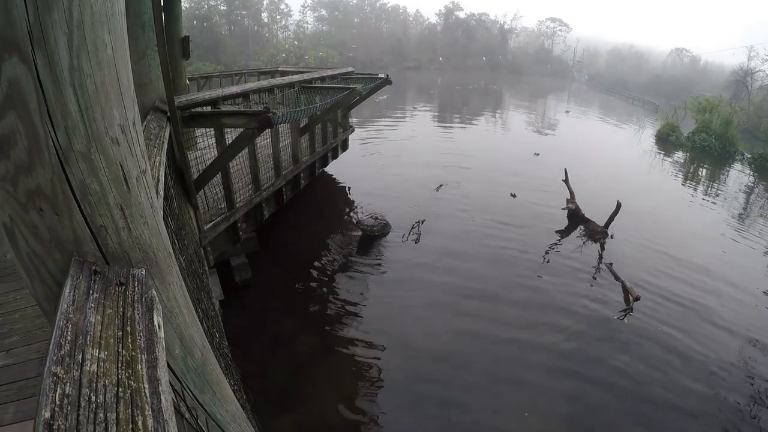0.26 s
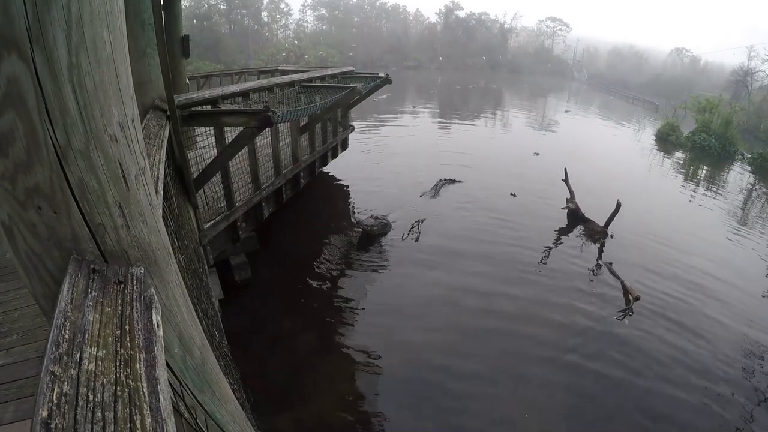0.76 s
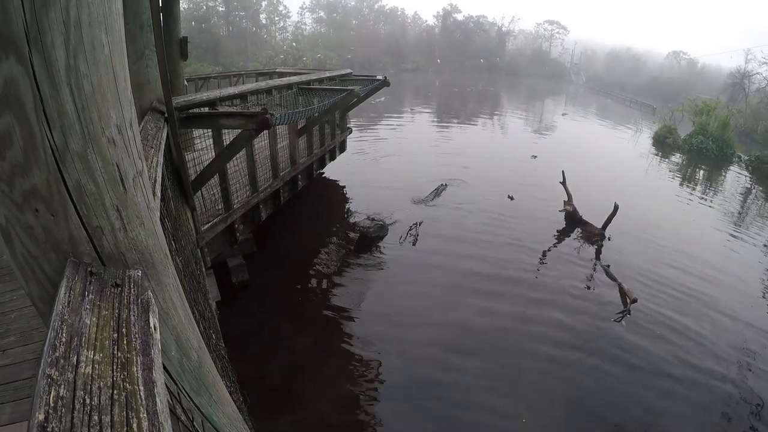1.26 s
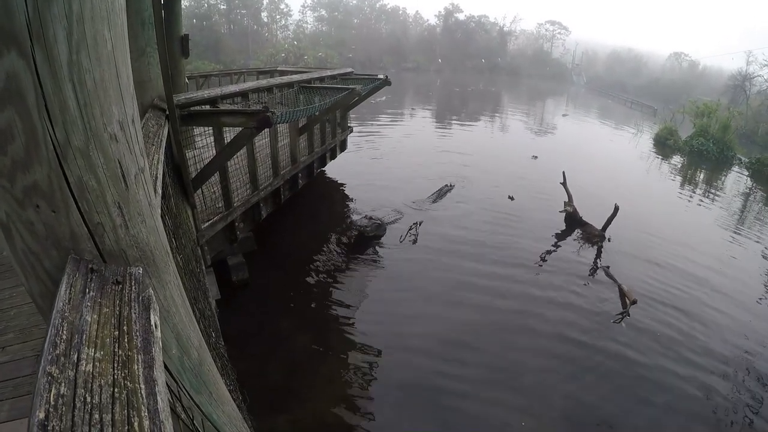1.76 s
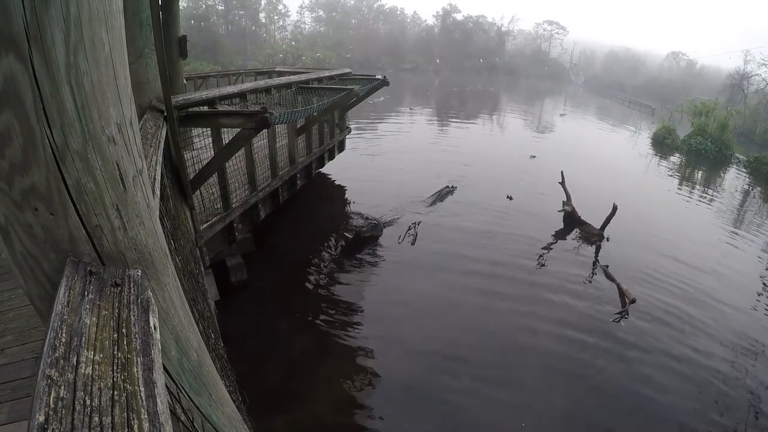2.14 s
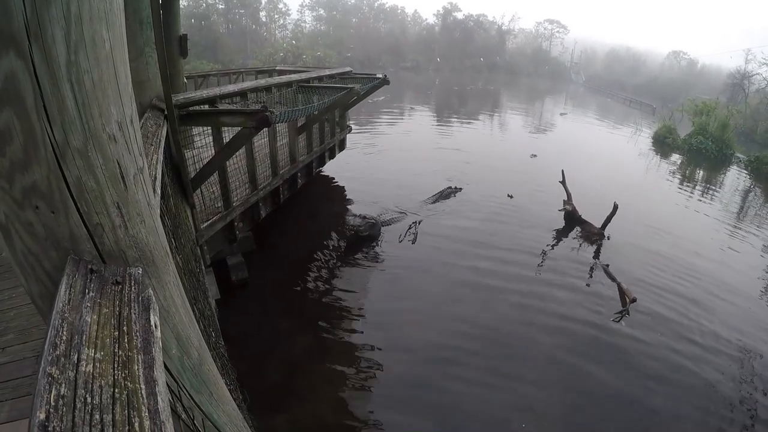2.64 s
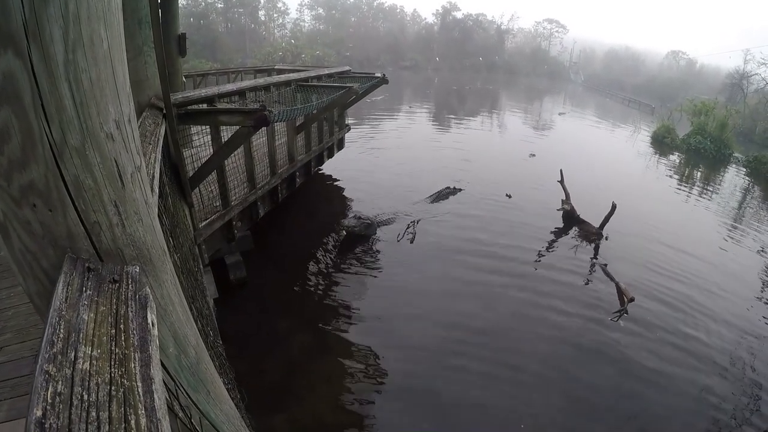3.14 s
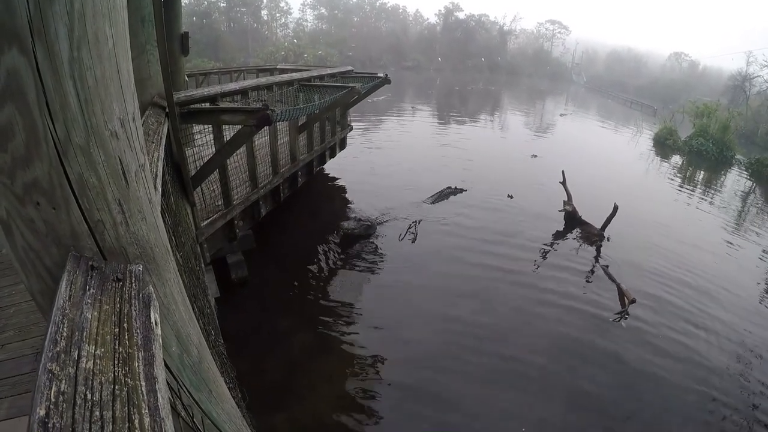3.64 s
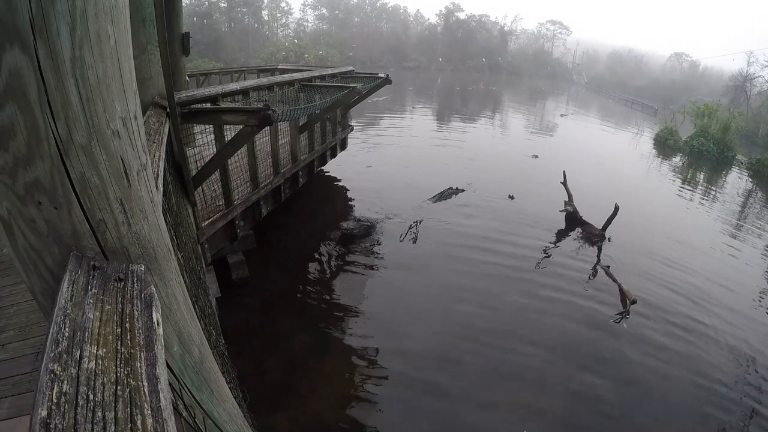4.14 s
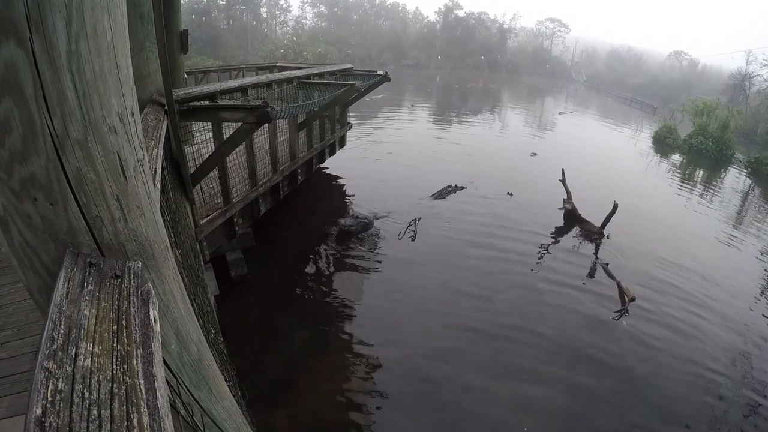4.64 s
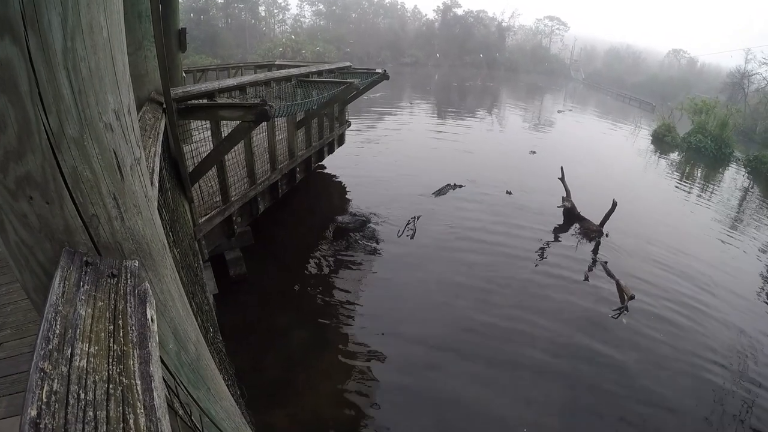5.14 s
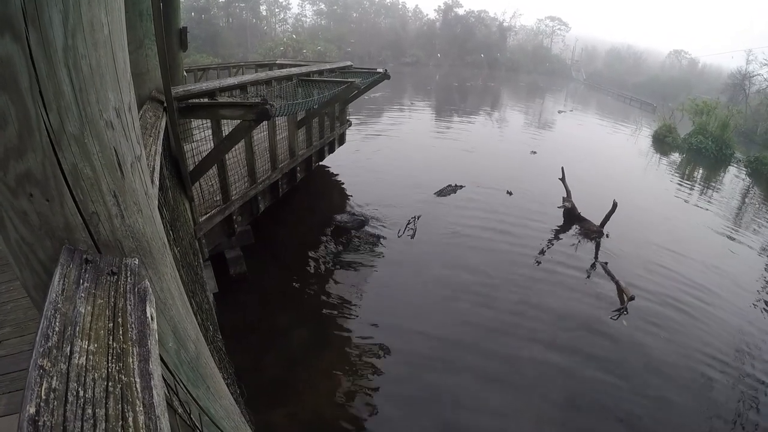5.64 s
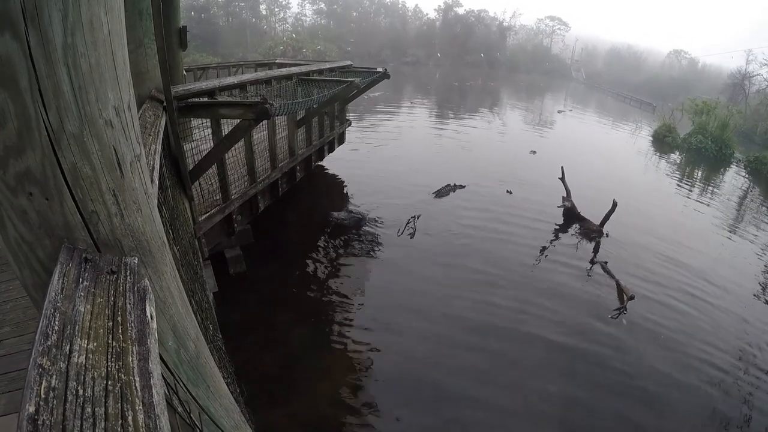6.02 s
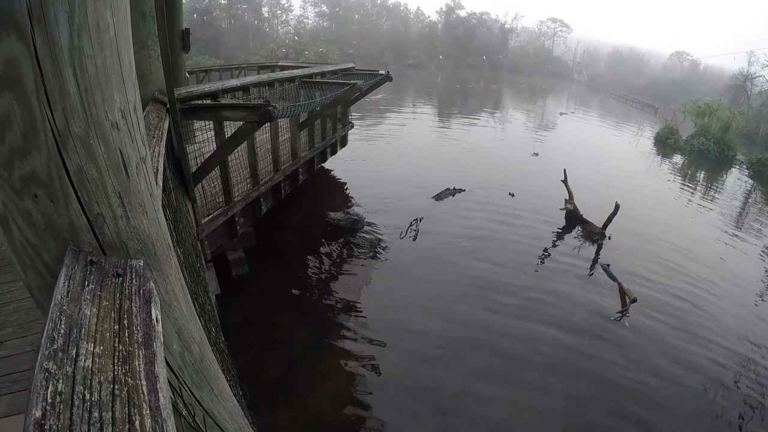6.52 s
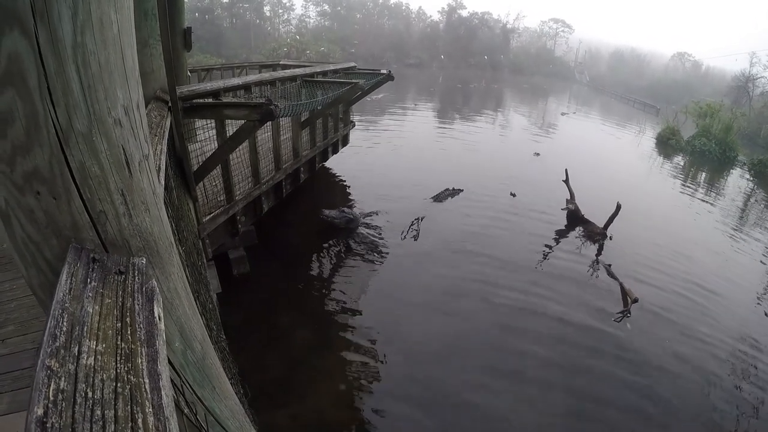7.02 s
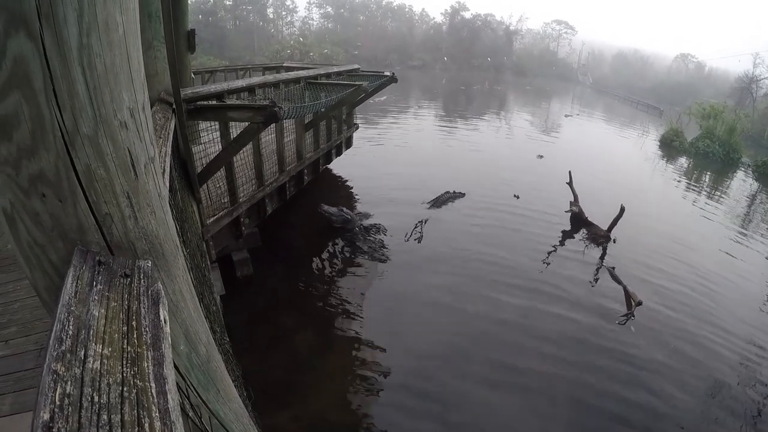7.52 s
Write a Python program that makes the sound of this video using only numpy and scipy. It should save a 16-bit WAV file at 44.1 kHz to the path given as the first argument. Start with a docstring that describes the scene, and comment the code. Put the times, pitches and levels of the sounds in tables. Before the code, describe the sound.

Deep rumbling alligator roars, near and far, with a low shudder, slapping beats and dancing droplets, under sharp falling bird chips.

```python
"""Alligators bellow in turn on a foggy pond, heard from a boardwalk, while a bird chips in a falling series.
The nearest one shudders almost below hearing, then roars in slaps and gusts while water dances on its back.
Each bellow is a train of vocal-fold pulses and rough air, shaped by the tones of a throat.
Chips and whistles are gliding tones, rasping calls are filtered noise, and drops are short rings.
Under it all lie a distant rumble, soft air and a faint high whine."""
import sys
import numpy as np
from scipy import signal
from scipy.fft import rfft, irfft, next_fast_len
from scipy.io import wavfile
from scipy.ndimage import uniform_filter1d, map_coordinates

SR = 44100
rng = np.random.default_rng(int(sys.argv[2]) if len(sys.argv) > 2 else 0)


def generate_wav(signal):
    """Clip the signal to [-1, 1] and save it as 16-bit WAV at the path in sys.argv[1]."""
    frames = np.transpose(np.atleast_2d(signal))
    scaled = np.clip(frames, -1, 1) * 32767
    pcm = np.round(scaled).astype(np.int16)
    wavfile.write(sys.argv[1], SR, pcm)


N = 342657
T = np.arange(N) / SR   # time of every sample, s

# colour of the droplets dancing on the later bellows: f/Hz, level/dB
LATE_SPRAY_COLOUR = [(750, -19), (1100, 3), (1500, -23), (2300, 4), (3200, -0.5), (4200, -2.5), (5200, -7),
                     (6500, -16), (8000, -17), (11000, -23.5), (14500, -25)]


def from_db(db):
    """Turn decibels into a gain."""
    return 10 ** (np.asarray(db) / 20)


def rms_one(x):
    """Scale a sound to unit power."""
    return x / np.sqrt(np.mean(x ** 2) + 1e-20)


def evened(x, window_s):
    """Hold the slow level at one; beats faster than the window stay."""
    power = np.abs(uniform_filter1d(x ** 2, int(window_s * SR)))
    return x / np.sqrt(power + 1e-12)


def in_time(rows):
    """Read each column of a table as a curve at every sample."""
    times, *columns = np.transpose(rows)
    return [np.interp(T, times, column) for column in columns]


def drift(rate):
    """Smooth random wander of spread one, with `rate` random points a second."""
    knots = rng.standard_normal(4000)
    coarse = T[::16]
    curve = map_coordinates(knots, [coarse * rate], order=3, mode="wrap")
    return rms_one(np.interp(T, coarse, curve))


def coloured(x, spectrum):
    """Filter to a given spectrum without pre-ringing (minimum phase); it falls steeply past its ends."""
    size = 2 * next_fast_len(N // 2 + SR // 2)
    octave = np.log2(np.maximum(np.arange(size // 2 + 1) * SR / size, 1))
    hz, db = np.transpose(spectrum)
    below = np.maximum(np.log2(hz[0]) - octave, 0)
    above = np.maximum(octave - np.log2(hz[-1]), 0)
    # 40 dB an octave outside the table, for two octaves
    shape_db = np.interp(octave, np.log2(hz), db) - 40 * np.minimum(below + above, 2)
    # folding the cepstrum gives the phase of a filter that never answers early
    cepstrum = irfft(np.log(from_db(shape_db)))
    cepstrum[1:size // 2] *= 2
    cepstrum[size // 2 + 1:] = 0
    return irfft(rfft(x, size) * np.exp(rfft(cepstrum)))[:N]


def resonate(x, modes):
    """Ring several resonances side by side, each with a pitch (Hz), width (Hz) and level (dB)."""
    out = 0
    for hz, width, db in modes:
        r = np.exp(-np.pi * width / SR)
        feedback = [1, -2 * r * np.cos(2 * np.pi * hz / SR), r * r]
        out = out + from_db(db) * (1 - r * r) * signal.lfilter([1, 0, -1], feedback, x)
    return out


def filtered(x, order, hz, side="low"):
    """Keep what lies below ("low") or above ("high") a pitch."""
    return signal.sosfilt(signal.butter(order, hz, side, fs=SR, output="sos"), x)


def add(out, s, sound):
    """Mix a short sound in at time s."""
    at = int(s * SR)
    out[at:at + len(sound)] += sound[:max(N - at, 0)]


def pond(x, t60, wet_db):
    """Scatter from the trees round the water: a noise tail that falls 60 dB in t60 seconds."""
    t = np.arange(SR) / SR
    tail = rng.standard_normal(SR) * from_db(-60 * t / t60) * (1 - np.exp(-t / .01))
    scatter = signal.fftconvolve(x, tail / np.linalg.norm(tail))[:N]
    return x + from_db(wet_db) * scatter


def pitch_of(call):
    """Pitch of a bellow: it climbs with the effort, then sags steadily as the air runs out."""
    start, _, climb, length, first_hz, top_hz, last_hz, _, _ = call
    return np.interp(T - start, [0, climb, length], [first_hz, top_hz, last_hz])


def effort(call, db_per_hz):
    """Gain of a bellow or of what it drives: attack, a hold that follows the pitch, release."""
    release_db_per_s = 49
    start, attack, _, length, _, top_hz, _, _, _ = call
    rise = np.clip((T - start) / attack, 0, 1)
    over = np.maximum(T - start - length, 0)
    return rise * from_db(db_per_hz * (pitch_of(call) - top_hz) - release_db_per_s * over)


def folds(call, throbs, jitter, throb_s):
    """Cycle count and drive of the vocal folds; each throb starts a cycle hard and then dies away."""
    cycles = np.cumsum(pitch_of(call) * (1 + jitter * drift(45))) / SR
    accent_db = np.zeros(N)
    for s, db in throbs:
        age = T - s + .004   # the push begins just before the throb
        accent_db += db * (age > 0) * np.exp(-(age / throb_s) ** 2)
    if len(throbs):
        # shift the count so that a whole cycle begins on each throb
        times = np.transpose(throbs)[0]
        offset = np.unwrap(np.interp(times, T, cycles), period=1)
        cycles = cycles - np.interp(T, times, offset)
    return cycles, from_db(accent_db)


def fold_clicks(cycles):
    """One click wherever the folds begin a new cycle."""
    whole = np.floor(cycles)
    return np.diff(whole, prepend=whole[0])


def bellow(call, throat, cycles, drive, chest_rough, mouth_rough, shimmer_db, gape_db_per_hz):
    """Fold pulses and rough air ring the throat: a deep chest note and a mouth band that opens with effort."""
    louder_db_per_hz = 0.5452   # the chest note weakens as the pitch drops below its top
    mouth_lag_s = 0.0078   # the mouth opens just after each chest throb
    split_hz = 240   # chest below, mouth above
    chest_db, mouth_db = call[-2:]
    pulses = rms_one(fold_clicks(cycles) * from_db(shimmer_db * drift(60)))
    air = rms_one(rng.standard_normal(N) * np.exp(-2 * (cycles % 1)))
    gape = np.interp(T - mouth_lag_s, T, drive) ** .6
    chest_flow = drive * (pulses + chest_rough * air)
    mouth_flow = gape * (pulses + mouth_rough * air)
    chest = evened(filtered(coloured(chest_flow, throat), 6, split_hz), 0.17)
    mouth = evened(filtered(coloured(mouth_flow, throat), 6, split_hz, "high"), 0.17)
    chest = chest * effort(call, louder_db_per_hz)
    mouth = mouth * from_db(mouth_db) * effort(call, gape_db_per_hz)
    return from_db(chest_db) * (chest + mouth)


def buzz(call, modes, cycles, drive, bite, click_db, level_db, db_per_hz):
    """A click and a burst of rasp on every cycle ring a few resonances, harder on a throb."""
    clicks = rms_one(fold_clicks(cycles))
    rasp = rms_one(rng.standard_normal(N) * np.exp(-bite * (cycles % 1)))
    bursts = filtered((rasp + from_db(click_db) * clicks) * drive ** 1.74, 3, 5500)
    rings = sum(resonate(bursts, [mode]) * from_db(2.5 * drift(20)) for mode in modes)
    return from_db(level_db) * effort(call, db_per_hz) * evened(rings, 0.48)


def spray(call, colour, drive, per_s, spread_db, ring_db, level_db, db_per_hz, build_s):
    """Dense droplets fall back, thrown harder by each throb; their rings swell, bend and gurgle."""
    # rings of the droplets: f/Hz, width/Hz, level/dB
    droplet_modes = [(877, 85, -14), (1059, 16, 9.5), (1326, 29, -2), (1685, 160, -5.5), (1943, 17, 3.5),
                     (2770, 36, 2), (3086, 130, 0)]
    sizes = from_db(spread_db * np.minimum(rng.exponential(1, N), 5)) * rng.choice([-1, 1], N)
    drops = sizes * (rng.random(N) < per_s / SR) * drive ** .25
    gurgle = 0
    for mode in droplet_modes:
        bent = np.interp(T + .0007 * drift(7), T, resonate(drops, [mode]))
        gurgle = gurgle + bent * from_db(4 * drift(11))
    fizz = rms_one(coloured(drops, colour)) + from_db(ring_db) * rms_one(gurgle)
    built = np.clip((T - call[0]) / build_s, 0, 1) ** .8
    return from_db(level_db) * built * effort(call, db_per_hz) * evened(fizz, 0.11)


def neighbour_alligator(opening, closing):
    """An animal close by bellows twice with a thin buzz on top; the second bellow sets water dancing."""
    # throat colour: f/Hz, level/dB
    throat = [(18, -48.5), (30, -7), (49, 2.5), (81, 0.5), (119, 0.5), (155, -1.5), (179, -6), (274, -8.5),
              (306, -22.5), (356, -50), (403, -11), (530, -35), (642, -73), (800, -54), (1040, -76),
              (1760, -120)]
    # throbs, where the folds slap shut hardest: t/s, accent/dB
    throbs = [(0.494, 5), (.555, 3.5), (.625, 5.5), (0.691, 5), (.76, 2.5), (.827, 4), (.895, 2.5),
              (.96, 4.5), (1.03, 4), (1.098, 3.5), (1.17, 5), (1.243, 6.5), (1.315, 4.5), (1.379, 5),
              (1.452, 6), (1.54, 4)]
    # resonances of the buzz on each bellow: f/Hz, width/Hz, level/dB
    opening_modes = [(1040, 35, 0), (1125, 45, -1), (1520, 45, -13), (1980, 35, -8), (2290, 70, 0),
                     (2500, 80, -4), (2690, 45, 5), (2960, 60, 0)]
    closing_modes = [(1120, 49.6, -15), (1760, 30, 2), (2240, 71, -13.5), (3110, 53, 13), (5100, 850, -0.5)]
    # rough air is given as a share of the pulses
    grit = dict(chest_rough=.36, mouth_rough=.65, shimmer_db=1.3)
    cycles, drive = folds(opening, throbs, jitter=.008, throb_s=.03)
    first = bellow(opening, throat, cycles, drive, **grit, gape_db_per_hz=1.0)
    first += buzz(opening, opening_modes, cycles, drive,
                  bite=0.93, click_db=-4.5, level_db=-45.5, db_per_hz=0.63)
    cycles, drive = folds(closing, [], jitter=.02, throb_s=.035)
    second = bellow(closing, throat, cycles, drive, **grit, gape_db_per_hz=2.0)
    second += buzz(closing, closing_modes, cycles, drive,
                   bite=1.7, click_db=-8, level_db=-39.5, db_per_hz=0.64)
    water = spray(closing, LATE_SPRAY_COLOUR, drive, per_s=4700, spread_db=2.5, ring_db=-8,
                  level_db=-39.5, db_per_hz=.9, build_s=.1)
    return pond(first + second, t60=.6, wet_db=-12) + water


def backdrop():
    """Filtered noise for the rumble of a distant chorus and soft air, and a wavering tone for a faint whine."""
    # slow levels: t/s, rumble level/dB, air level/dB
    levels = [(0, -29, -55), (1.3, -28, -58), (1.9, -29.5, -54.5), (3.3, -31.5, -58.5), (3.8, -35.5, -59),
              (5, -34, -59), (6.3, -24, -57), (7.3, -28, -56)]
    # colours of the rumble and of the air: f/Hz, level/dB
    rumble_colour = [(25, -9.5), (45, 3), (65, -3), (100, -6.5), (135, -8), (165, -10), (200, -14),
                     (300, -18), (430, -20.5), (540, -28), (660, -41), (900, -56)]
    air_colour = [(700, -2), (1050, -1.5), (1400, -5.5), (2000, -3.5), (3200, -8.5), (4500, -10.5),
                  (6000, -14.5), (8000, -21), (12000, -24.5), (14500, -26)]
    whine_hz, whine_db = 10060, -74
    rumble_db, air_db = in_time(levels)
    rumble = from_db(rumble_db + drift(12)) * rms_one(coloured(rng.standard_normal(N), rumble_colour))
    air = from_db(air_db + drift(9)) * rms_one(coloured(rng.standard_normal(N), air_colour))
    whine = from_db(whine_db) * np.sin(2 * np.pi * np.cumsum(whine_hz + 12 * drift(54)) / SR)
    return rumble + air + whine


def glide(length, from_hz, to_hz, db):
    """A pure note that swells, slides and fades."""
    hz = np.linspace(from_hz, to_hz, int(length * SR))
    return from_db(db) * np.hanning(len(hz)) * np.sin(2 * np.pi * np.cumsum(hz) / SR)


def far_birds():
    """Thin gliding whistles and harsh hissing calls of filtered noise in the trees."""
    # whistles: t/s, length/s, first f/Hz, last f/Hz, level before the mix/dB
    whistles = [(0.237, 0.18, 5840, 6500, -59.5), (1.48, 0.23, 6687, 7330, -71),
                (3.739, 0.1, 2920, 3320, -60), (4.255, 0.092, 2800, 3370, -62),
                (4.853, 0.14, 5820, 6180, -67), (4.841, 0.12, 2890, 3060, -56.5),
                (4.964, 0.098, 4120, 3640, -54), (5.209, 0.075, 4400, 3340, -37),
                (6.72, 0.053, 6300, 7040, -55), (6.873, 0.053, 2900, 3580, -51),
                (6.993, 0.095, 4480, 3810, -48), (7.215, 0.029, 4650, 5120, -49)]
    # hissing calls: centre t/s, half length/s, main f/Hz, level/dB
    rasps = [(4.285, 0.059, 5300, -60), (7.073, 0.055, 3420, -48.5), (7.233, 0.012, 3880, -53),
             (7.36, 0.053, 4100, -55.5), (7.456, 0.054, 3720, -43.5)]
    # colour of the hiss: f/Hz, level/dB
    rasp_colour = [(2500, 0), (3100, 8), (4200, -5.5), (5500, -4), (6500, -24), (8000, -13), (10000, -47),
                   (12500, -31), (14500, -50)]
    rasp_width_hz = 570   # band round the main pitch
    whistling, rasping = np.zeros(N), 0
    for s, *note in whistles:
        add(whistling, s, glide(*note))
    air = rng.standard_normal(N) * from_db(2.1 * drift(250))
    hiss = rms_one(coloured(air, rasp_colour))
    for s, half, hz, db in rasps:
        swell = np.exp(-((T - s) / half) ** 2)
        band = rms_one(resonate(air, [(hz, rasp_width_hz, 0)]))
        rasping += from_db(db) * swell * (hiss + band)
    return from_db(-2.5) * pond(whistling, t60=0.55, wet_db=4) + rasping


def chip(length, top_hz, level_db, wobble, flutter_db):
    """A fluttering whistle that flicks up with a blip, arches over, falls and ends in a rough snap."""
    # what the beak lets through of the overtones: f/Hz, level/dB
    overtone_colour = [(5500, -13.5), (7500, -28.5), (8700, -24), (9400, -29), (10000, -31), (11500, -40),
                       (12900, -36), (14000, -44)]
    shrill_from_hz, shrill_span_hz = 4650, 442
    fall_hz, flutter_hz = 1449, 163.6   # slow fall of a high chip; flutter rate
    flick_hz, flick_s, snap_hz, snap_s = 1986, 0.00139, 850, 0.00363   # upward start, steep end
    swell_db, shrill_fade_db = 11, 18   # growth from start to end; what shrillness takes off
    # a chip that starts higher is shriller: it holds its top longer and is loudest near the start
    shrill = np.clip((top_hz - shrill_from_hz) / shrill_span_hz, 0, 1)
    t = np.arange(int(length * SR)) / SR
    u = t / length
    wobble = wobble[:len(t)]
    crest = 0.23 * shrill   # share of the chip before its top

    # pitch
    bend = 1.6 + 1.21 * shrill ** 3   # 1 would be a straight fall
    arch = np.abs((u - crest) / (1 - crest)) ** bend
    fall_hz = fall_hz * min(top_hz / shrill_from_hz, 1) ** 3   # a low chip falls less
    flick = flick_hz * np.exp(-t / flick_s)
    snap = snap_hz * np.exp((t - length) / snap_s)
    pitch = top_hz - fall_hz * arch - flick - snap
    # roughness of the pitch, strongest at the two ends
    breath = uniform_filter1d(rng.standard_normal(SR), size=14)[:len(t)]
    hoarse = (.17 * u ** 2 + .25 * (1 - u) ** 10 + .05) * breath
    waver = .013 * (1 - .6 * shrill) * wobble
    phase = 2 * np.pi * np.cumsum(pitch * (1 + hoarse + waver)) / SR

    # tone and loudness
    overtones = 0
    for k in (2, 3):
        overtone_db = np.interp(k * pitch, *np.transpose(overtone_colour)) + 2 * wobble
        overtones = overtones + from_db(overtone_db) * np.sin(k * phase)
    growth_db = (swell_db - shrill_fade_db * shrill) * (u - .5)
    flutter = np.sin(2 * np.pi * (flutter_hz * t + rng.random())) + .5 * wobble
    note = from_db(growth_db - 3.5) * np.sin(phase) + overtones
    note = note * from_db(flutter_db * flutter) * signal.windows.tukey(len(t), .12)
    note *= np.minimum(u / (crest + 1e-3), 1) ** 1.5
    # a low rising blip blunts the start, less in a shrill chip
    add(note, .005, glide(.007, 2697, 3696, -5.5) * (1 - .5 * shrill))
    return from_db(level_db) * note


def chipping_birds():
    """Chips from the trees, each followed by duller echoes and a diffuse tail."""
    # chips: t/s, length/s, top f/Hz, level before the mix/dB
    chips = [(1.149, 0.053, 4940, -29), (1.656, 0.05, 4885, -28), (1.91, 0.058, 4824, -30),
             (2.116, .056, 4750, -32), (2.325, 0.06, 4630, -32), (2.52, 0.055, 4605, -31),
             (2.713, 0.057, 4640, -31.5), (2.906, 0.057, 4580, -33), (3.091, 0.057, 4520, -32.5),
             (3.276, .056, 4650, -31.5), (3.475, 0.057, 4586, -30.5), (5.937, 0.04, 3780, -39),
             (6.173, 0.037, 3750, -37), (6.616, .054, 5260, -29)]
    # echoes off the boardwalk and trunks: delay t/s, level/dB
    echo_table = [(.005, -10), (.009, -10), (.016, -13), (.0275, -4.5), (.043, -13)]
    out, waver = np.zeros(N), drift(350)
    for s, length, top_hz, db in chips:
        add(out, s, chip(length, top_hz, db, waver[int(s * SR):], flutter_db=3.0))
    dull = filtered(out, 2, 3500)
    echoes = sum(from_db(db) * np.interp(T - delay, T, dull, left=0) for delay, db in echo_table)
    leafy = filtered(out, 1, 4000)
    tail = pond(leafy, t60=0.57, wet_db=-3.5) - leafy   # the scatter alone
    return from_db(-0.5) * out + echoes + tail


def far_alligators(high, *lower):
    """Overlapping bellows from across the pond, smeared by the trees; the highest one rasps."""
    # throat colours of the high one and the others: f/Hz, level/dB
    high_throat = [(45, -29), (62, -6), (90, -8), (120, 2.5), (150, 0.5), (240, -7), (300, -6),
                   (520, -16.5), (700, -37.5)]
    low_throat = [(45, -19), (60, -8), (88, -3), (115, 0), (135, -7), (155, -4), (178, 3), (215, -3),
                  (258, -2), (305, 0), (345, -9), (410, -10), (490, -17), (700, -36)]
    # resonances of the rasp: f/Hz, width/Hz, level/dB
    rasp_modes = [(540, 35, 6.5), (655, 30, -3), (2020, 120, -12), (2440, 250, -2.5)]
    grit = dict(chest_rough=.3, mouth_rough=.25, shimmer_db=.9)
    cycles, drive = folds(high, [], jitter=.003, throb_s=.035)
    out = bellow(high, high_throat, cycles, drive, **grit, gape_db_per_hz=2.5)
    out += buzz(high, rasp_modes, cycles, drive, bite=1.6, click_db=-7, level_db=-51.5, db_per_hz=-0.2)
    for call in lower:
        cycles, drive = folds(call, [], jitter=.003, throb_s=.035)
        out += bellow(call, low_throat, cycles, drive, **grit, gape_db_per_hz=0.6)
    return pond(out, t60=.8, wet_db=-12)


def drips():
    """Single larger drops on the water: a tiny splash and a short ring."""
    # drops: t/s, f/Hz, time to fall 60 dB/s, level/dB
    drops = [(4.217, 2850, 0.042, -43), (4.616, 3580, .04, -46.5), (7.484, 5140, 0.091, -42),
             (7.571, 3055, 0.034, -25), (7.573, 5170, .08, -48), (7.594, 2270, .04, -33),
             (7.612, 5140, .06, -38), (7.7, 1130, 0.12, -36.5), (7.706, 5180, 0.09, -34.5)]
    out, t = np.zeros(N), T[:SR // 4]
    for s, hz, t60, db in drops:
        splash = rms_one(resonate(rng.standard_normal(len(t)), [(hz, hz / 2, 0)]))
        fade = from_db(db - 60 * t / t60) * (1 - np.exp(-t / .002))
        add(out, s, fade * (np.sin(2 * np.pi * hz * t) + .25 * splash))
    return pond(out, t60=.4, wet_db=-10)


def shudder():
    """The flanks pump the water about twenty times a second, with a few overtones."""
    # overtones: multiple of the pumping rate, level/dB
    orders = [(1, -7.5), (2, -19), (3, -23.5), (4, -33.5)]
    start_s, end_s, rise_s, fall_s = 4.543, 5.09, .08, .04
    pump_hz, level_db = 21.92, -16.5
    phase = 2 * np.pi * pump_hz * (T - start_s)
    wave = sum(from_db(db) * np.cos(round(k) * phase) for k, db in orders)
    gate = np.clip(np.minimum((T - start_s) / rise_s, (end_s - T) / fall_s), 0, 1)
    return from_db(level_db) * rms_one(wave) * gate


def thump(ring_hz):
    """One slap of the folds rings the throat and booms in the trunk."""
    attack_s, ring_cycles = 0.0021, 1.94   # rise, and decay of the throat in its own cycles
    body_hz, body_s, body_db = 51, 0.017, -0.5
    t = T[:SR // 5]
    throat = -np.sin(2 * np.pi * ring_hz * t) * np.exp(-t * ring_hz / ring_cycles)
    trunk = from_db(body_db) * np.sin(2 * np.pi * body_hz * t) * np.exp(-t / body_s)
    return (throat + trunk) * (1 - np.exp(-(t / attack_s) ** 2))


def chest_beats():
    """An even roll breaks into single slaps, whose weaker rebounds fall in step with the ring."""
    # single slaps; the ring follows how tight the throat is: t/s, ring f/Hz, level/dB
    slaps = [(5.276, 126.4, -2.5), (5.36, 101.3, -9.5), (5.435, 103, -6.5), (5.509, 111, -6),
             (5.585, 125.7, -5.5), (5.678, 150, -5), (5.77, 148.2, -4), (5.846, 138, -5.5),
             (5.938, 138, -7.5), (6.031, 140, -11), (6.218, 127, -12)]
    roll_start_s, roll_length_s, beats_per_s = 5, 0.54, 52
    roll_hz, roll_db = 106.5, -11.5   # middle of the rising ring; level before swell and scatter
    rebounds, rebound_s = 3, .019   # how many, and their rough spacing
    rebound_db, rebound_loss_db = -9, 4   # first rebound against its slap; loss at each next one
    out = np.zeros(N)
    for age in np.arange(0, roll_length_s, 1 / beats_per_s):
        done = age / roll_length_s
        swell = np.sin(np.pi * (.02 + .98 * done)) ** .4
        beat = thump(roll_hz * (1 + .2 * (done - .5)))
        at = roll_start_s + age + rng.normal(0, .0004)
        add(out, at, swell * from_db(roll_db + rng.normal()) * beat)
    for s, ring_hz, db in slaps:
        add(out, s, from_db(db) * thump(ring_hz))
        gap = np.round(rebound_s * ring_hz) / ring_hz   # a whole number of ring cycles
        for k in range(rebounds):
            gain = from_db(db + rebound_db - rebound_loss_db * k + 2 * rng.normal())
            add(out, s + (k + 1) * gap + rng.normal(0, .0008), gain * thump(ring_hz))
    return filtered(out, 1, 14, "high")


def sliding(x, hz, width):
    """A resonance whose centre follows a curve: shift it to zero, smooth, shift back."""
    turn = np.exp(2j * np.pi * np.cumsum(hz) / SR)
    r = np.exp(-np.pi * width / SR)
    return (turn * signal.lfilter([1 - r], [1, -r], x * turn.conj())).real


def growl(call, cycles, drive, level_db, db_per_hz):
    """Rasping bursts ring resonances that slide down as the air runs out, wander and swell by turns."""
    # sliding resonances: first f/Hz, last f/Hz, width/Hz, level/dB
    growl_modes = [(950, 715, 37, 0), (1095, 1030, 25, -4), (1340, 1270, 25, -0.5), (1750, 1640, 34, -3.5),
                   (2030, 2000, 19, 4), (2530, 2380, 41, -2), (2764, 2680, 26, 2.5), (3240, 3110, 41, -0.5)]
    wander_hz, flicker_db, build_s = 16, 4, 0.14
    start, length = call[0], call[3]
    bursts = rng.standard_normal(N) * np.exp(-2.5 * (cycles % 1)) * drive ** .25
    rings = 0
    for first_hz, last_hz, width, db in growl_modes:
        hz = np.interp(T - start, [0, length], [first_hz, last_hz]) + wander_hz * drift(12)
        rings = rings + sliding(bursts, hz, width) * from_db(db + flicker_db * drift(18))
    built = np.clip((T - start) / build_s, 0, 1)
    return from_db(level_db) * built * effort(call, db_per_hz) * evened(rings, .23)


def near_alligator(call):
    """A shudder, then a roar with slaps and rasping gusts that ends in a hoot, with the water dancing."""
    # throat colour: f/Hz, level/dB
    throat = [(18, -65), (30, -8), (49, -5), (75, 1.5), (110, -2), (128, 3.5), (148, 2), (164, -6.5),
              (198, -24.5), (228, -9.5), (271, -18), (339, -12.5), (364, -5.5), (397, -12), (459, -32),
              (700, -49.5), (910, -68), (1540, -120)]
    # gusts of air through the mouth, mostly between the slaps: t/s, accent/dB
    gusts = [(5.065, 4.5), (5.228, 5), (5.296, 14.5), (5.362, 13.5), (5.464, 13.5), (5.532, 10.5),
             (5.577, 15.5), (5.665, 4), (5.795, 9), (5.845, 12.5), (5.944, 4), (6.038, 0)]
    # colour of the droplets on its back: f/Hz, level/dB
    spray_colour = [(700, -13), (900, -5.5), (1550, -11.5), (2100, -4.5), (3200, -6), (4200, -9.5),
                    (5400, -10.5), (6500, -20), (8500, -27.5), (11000, -42), (14500, -42)]
    cycles, drive = folds(call, gusts, jitter=.04, throb_s=.028)
    roar = bellow(call, throat, cycles, drive,
                  chest_rough=.55, mouth_rough=.7, shimmer_db=1.7, gape_db_per_hz=1.05)
    roar = np.interp(T + .0018 * drift(14), T, roar)   # the throat flexes and bends its tones
    add(roar, 6, glide(length=0.33, from_hz=158.5, to_hz=146, db=-13))   # the clear hoot
    rasp = growl(call, cycles, drive, level_db=-40.5, db_per_hz=0.95)
    water = spray(call, spray_colour, drive, per_s=3500, spread_db=1.5, ring_db=-7,
                  level_db=-41, db_per_hz=0.78, build_s=0.21)
    return shudder() + pond(roar + chest_beats() + rasp, t60=.5, wet_db=-16) + water


def answering_alligator(call):
    """A hoarse reply to the nearest animal, with much rough air and its own dancing water."""
    # throat colour: f/Hz, level/dB
    throat = [(35, -6), (50, 1), (70, -3), (120, 0), (185, -2), (225, -3), (250, -8), (275, -11), (300, -8),
              (345, -19), (400, -11), (440, -18), (480, -16), (540, -26), (700, -48)]
    cycles, drive = folds(call, [], jitter=.012, throb_s=.035)
    roar = bellow(call, throat, cycles, drive,
                  chest_rough=.8, mouth_rough=.55, shimmer_db=2.0, gape_db_per_hz=0.06)
    water = spray(call, LATE_SPRAY_COLOUR, drive, per_s=4700, spread_db=3.0, ring_db=-3.0,
                  level_db=-47, db_per_hz=0.8, build_s=0.45)
    return pond(roar, t60=.8, wet_db=-12) + water


def scene():
    """Everything on the pond, in one channel."""
    # one row per bellow, in the order unpacked below: t/s, attack/s, climb/s, length/s,
    # first f/Hz, top f/Hz, last f/Hz, chest level/dB, mouth level against the chest/dB
    bellows = [ (-.08, 0.21, 0.19, 1.835, 57.7, 58.48, 38.57, -20, -11.5),
               (1.56, 0.093, 0.24, 0.51, 57, 61.25, 56.05, -27.5, -6),
               (1.85, 0.1, 0.1, 0.81, 54, 54.04, 49.75, -32, -3),
               (2.12, 0.076, 0.58, 1.02, 45.03, 45.33, 42.37, -31, -6.5),
               (5.03, 0.0085, 0.2, 1.28, 51.63, 55.05, 40.86, -18, -4.5),
               (6.22, 0.29, .38, 1.183, 50.03, 50.62, 40.95, -22, -10),
               (7.5, 0.0096, 0.32, .4, 44.26, 57.28, 55, -11.5, -8), ]
    opening, far_high, far_middle, far_low, near, answer, closing = bellows
    alligators = neighbour_alligator(opening, closing)
    alligators = alligators + far_alligators(far_high, far_middle, far_low)
    alligators = alligators + near_alligator(near) + answering_alligator(answer)
    birds = far_birds() + chipping_birds()
    return (alligators + backdrop() + birds + drips())[None]


def record(dry):
    """Round the highest peaks off below 0.95 and cut the treble above 15200 Hz."""
    rounded = dry / (1 + (dry / .95) ** 6) ** (1 / 6)
    return signal.sosfilt(signal.ellip(10, .1, 80, 15200, fs=SR, output="sos"), rounded)


dry = scene()
out = record(dry)
generate_wav(out)
```